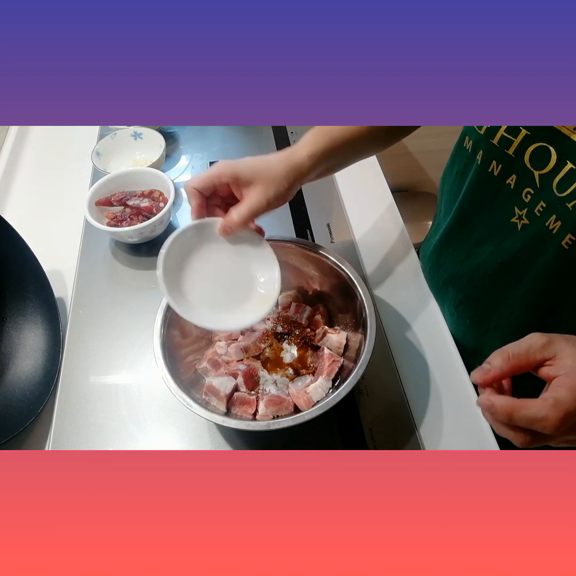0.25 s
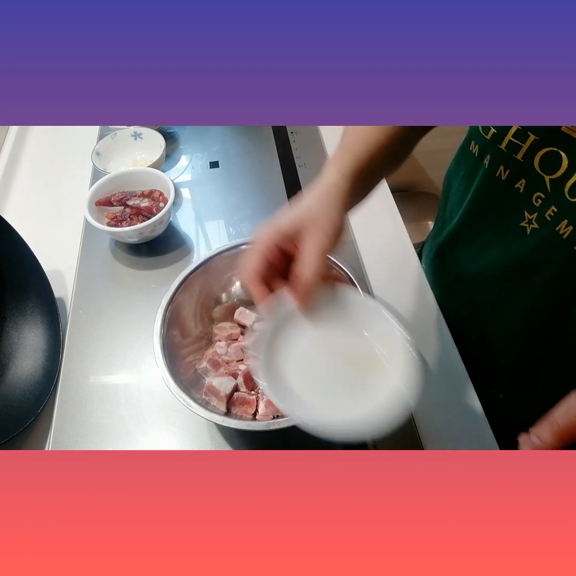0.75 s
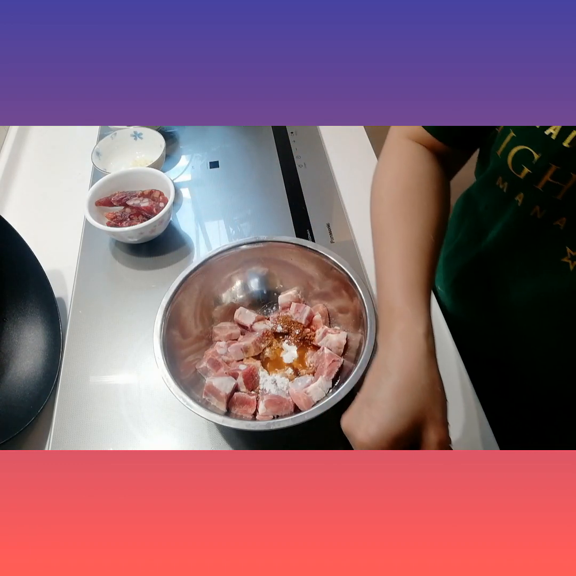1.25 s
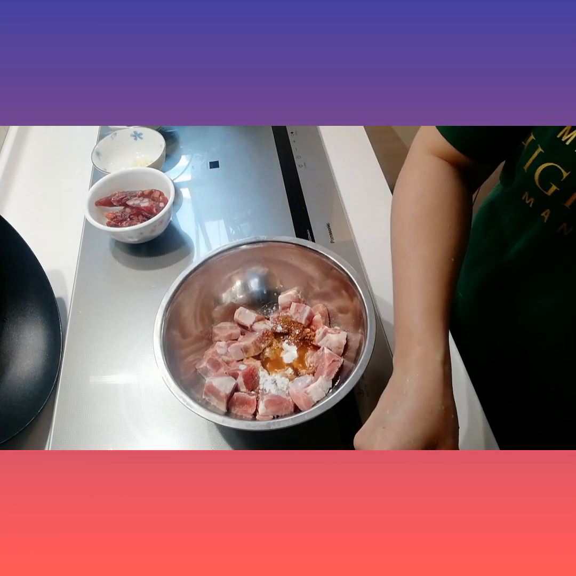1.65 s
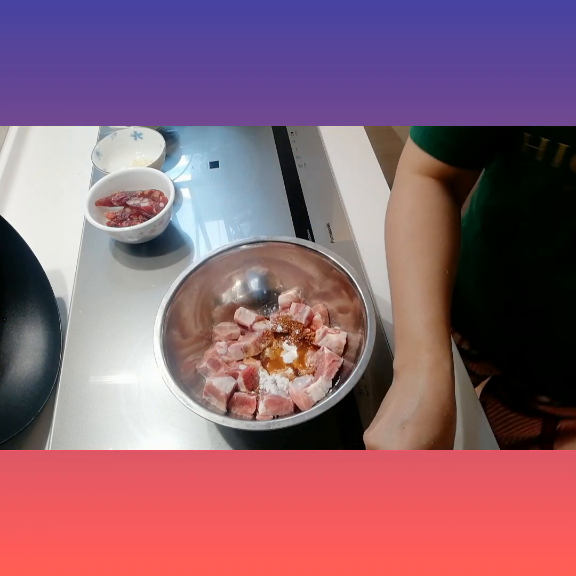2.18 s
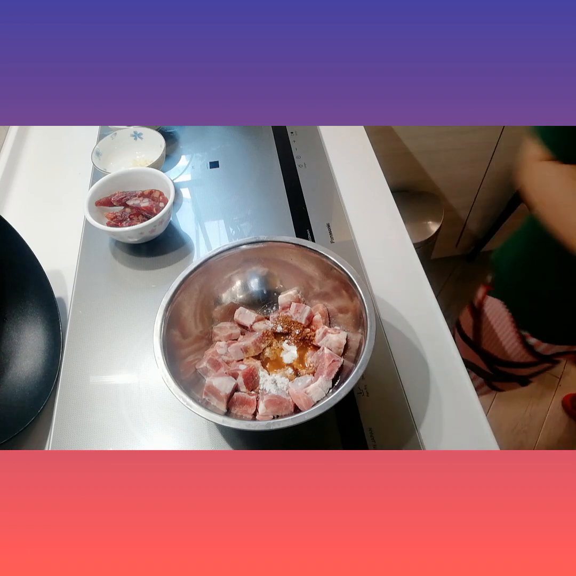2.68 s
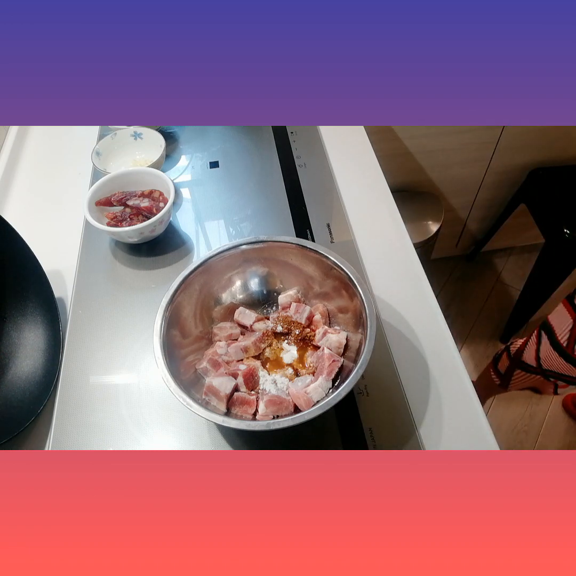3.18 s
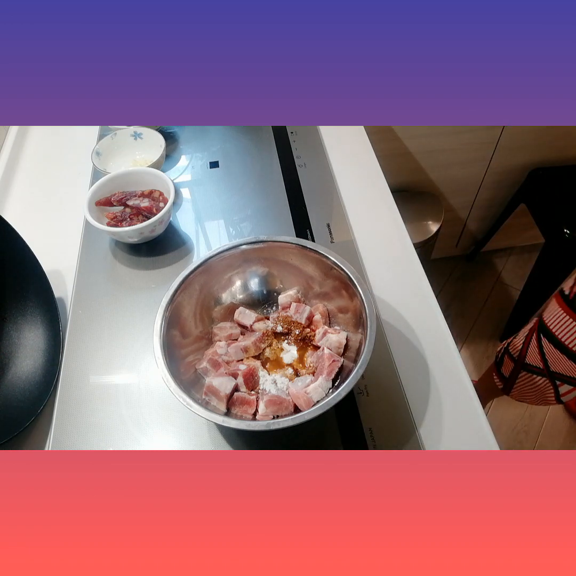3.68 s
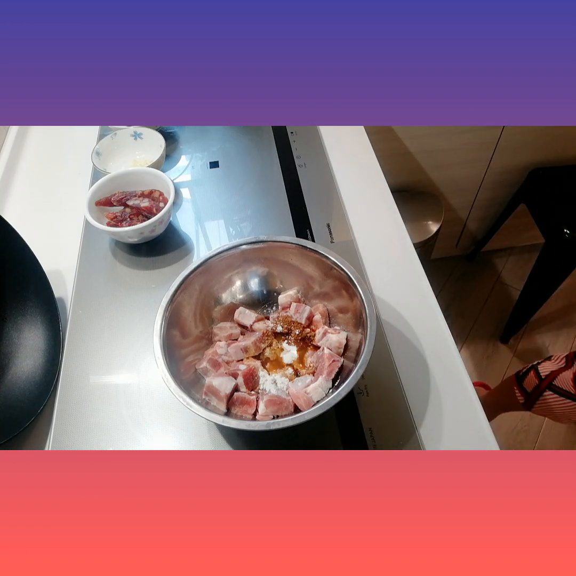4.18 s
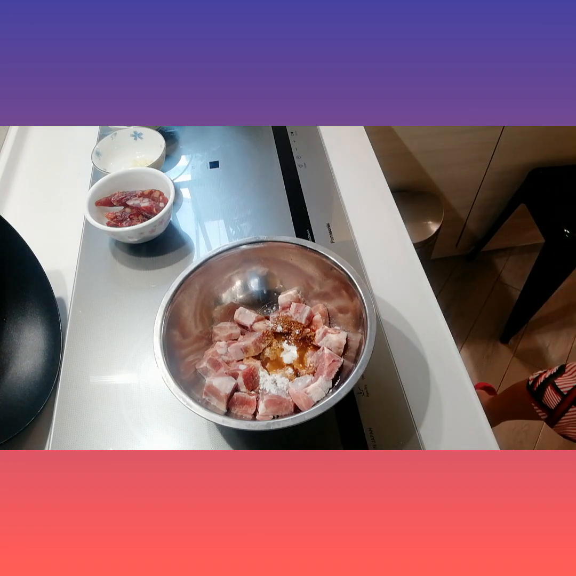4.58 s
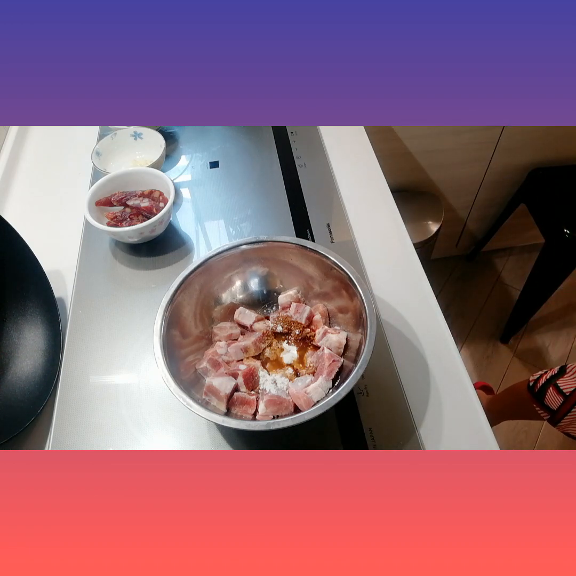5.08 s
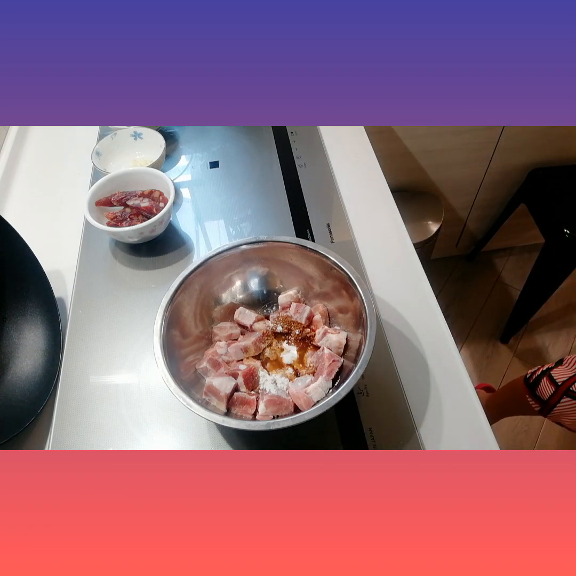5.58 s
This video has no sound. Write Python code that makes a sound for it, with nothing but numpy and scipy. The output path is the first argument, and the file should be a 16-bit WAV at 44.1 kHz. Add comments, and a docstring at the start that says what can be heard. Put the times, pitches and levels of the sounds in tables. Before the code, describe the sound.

A ventilation fan drones softly throughout, an airy rush with a low hum, in a hard-walled kitchen with a short echo. At about 1.5 seconds a small china dish lands on a worktop, close and slightly left, with a bright clack and a few rim ticks as it rocks. From 1.9 to 2.2 seconds it is shifted, giving damped clacks and hollow thuds. Soft sleeve and hand swishes follow until about 3 seconds. Feet shuffle, and at 3.3 seconds a cupboard door thuds dully further off. Around 3.5 seconds a bottle slides out and knocks the shelf, and at 3.7 its cap snaps open. Faint shuffling continues. A light knock at 5 seconds leads straight into the loudest sound, a bright glass clink against other ware, slightly left, ringing for about half a second. A soft footfall and rustle come near 5.5 seconds, over the fan.

```python
"""A hard-walled kitchen, with a ventilation fan droning underneath. Close by, a cook puts a small china dish
down on a worktop, shifts it, picks up a bottle with a few hand-damped clacks, and steps away. Further off a
cupboard thuds, a bottle is dragged out, its cap snaps open, and the glass clinks loudly against other ware.
Each knock is a burst of fading noise; china and glass add ringing tones, and the walls echo. Sleeves, hands and
shuffling feet make soft swells of noise."""
import sys
import numpy as np
from scipy import signal
from scipy.fft import rfft, irfft, next_fast_len
from scipy.io import wavfile
from scipy.ndimage import uniform_filter1d

SR = 44100
rng = np.random.default_rng(int(sys.argv[2]) if len(sys.argv) > 2 else 0)


def inscribe(sig):
    """Save sig as 16-bit PCM at rate SR to the path in sys.argv[1].

    A 1-D sig is mono; a 2-D sig holds one channel per row.
    Samples are clipped to [-1, 1] before scaling.
    """
    pcm = np.round(np.clip(np.atleast_2d(sig).T, -1, 1) * 32767)
    wavfile.write(sys.argv[1], SR, pcm.astype(np.int16))


N = 257544
TIME = np.arange(N) / SR
AGE = np.arange(int(.8 * SR)) / SR   # seconds since a knock


def from_db(db):
    """Turn decibels into a gain."""
    return 10 ** (np.asarray(db) / 20)


def rms_one(x):
    """Scale a sound to an average (rms) level of one."""
    return x / np.sqrt(np.mean(x ** 2) + 1e-20)


def at_hz(points, hz):
    """Read between a table's rows on a log-frequency scale."""
    freq, value = np.transpose(points)
    return np.interp(np.log(np.maximum(hz, 1)), np.log(freq), value)


def coloured(x, spectrum):
    """Give a sound a tone colour without smearing it back in time (minimum phase)."""
    size = 2 * next_fast_len(x.shape[-1])
    gain = from_db(at_hz(spectrum, np.fft.rfftfreq(size, 1 / SR)))
    cepstrum = irfft(np.log(gain))
    cepstrum[1:size // 2] *= 2
    cepstrum[size // 2 + 1:] = 0
    return irfft(rfft(x, size) * np.exp(rfft(cepstrum)))[..., :x.shape[-1]]


def fade(seconds):
    """A fade time is how long a sound takes to fall by 60 dB."""
    return 1000 ** (-AGE / seconds)


def swell(at_s, level_db, rise_s, fall_s):
    """One movement: it gains 20 dB over its rise and loses 20 dB over its fall."""
    away = np.maximum((at_s - TIME) / rise_s, (TIME - at_s) / fall_s)
    return from_db(level_db - 20 * np.minimum(away, 10))


# Stereo spread. Each row: frequency in Hz, side level against the middle in dB.
STEREO_WIDTH = [(50, -26), (130, -31), (250, -6.5), (500, 5), (1000, 3), (12000, -2)]
def stereo_noise(size, width=STEREO_WIDTH):
    """Even noise, centred in the bass and wide higher up."""
    mid, side = rfft(rng.standard_normal((2, size)))
    share = from_db(at_hz(width, np.fft.rfftfreq(size, 1 / SR)))
    return irfft((mid + share * side * [[1], [-1]]) / np.sqrt(1 + share ** 2), size)


# How long the room rings. Each row: frequency in Hz, fade time in seconds.
ROOM_FADE = [(80, 0.53), (300, 0.47), (1000, 0.63), (3500, 0.55), (8000, 0.55), (14000, 0.4)]
def kitchen_echo(build_s):
    """Countless wall reflections blur together; each band fades at its own rate."""
    noise, echo = rfft(stereo_noise(len(AGE))), 0
    hz = np.fft.rfftfreq(len(AGE), 1 / SR)
    centres = np.geomspace(80, 14000, 10)
    for centre, pick in zip(centres, np.eye(len(centres))):
        band = irfft(noise * at_hz(np.c_[centres, pick], hz), len(AGE))
        echo = echo + band * fade(at_hz(ROOM_FADE, centre))
    echo = echo * (1 - np.exp(-AGE / build_s))
    return rms_one(echo) / np.sqrt(len(AGE))


def reflected(x, echo):
    """What the walls send back."""
    return signal.fftconvolve(x, echo, axes=-1)[:, :x.shape[-1]]


def wander(rate_hz, count=200):
    """A random drift in strength and phase for each channel."""
    knots = rng.standard_normal((2, count, 2)) @ [1, 1j] / np.sqrt(2)
    return np.array([np.interp(AGE * rate_hz, np.arange(count), row) for row in knots])


def ringing(tones, shimmer, flutter_hz=59.0):
    """A struck object's tones flutter as wall reflections pile up and beat with them."""
    pitches, levels_db, fades_s = np.transpose(tones)
    gains, ring = from_db(levels_db), 0
    reflections = shimmer * np.sqrt(AGE * flutter_hz)   # echoes add as the root of their number
    for hz, gain, fade_s in zip(pitches, gains, fades_s):
        tone = np.exp(2j * np.pi * (hz * AGE + rng.random((2, 1)))) * fade(fade_s)
        ring = ring + gain * np.real(tone * (1 + reflections * wander(flutter_hz)))
    return ring / np.sqrt(np.sum(gains ** 2))


def knocks(hits, colour, echo, gain_db, rise_s, tones=None, ring_echo_db=0, shimmer=0.93):
    """Each contact makes a noise burst, an echo and any ringing tones; gain_db shifts every level."""
    out = np.zeros((2, N + len(AGE)))
    attack = 1 - np.exp(-AGE / rise_s)
    for start_s, level_db, fade_s, echo_db, *ring_db in hits:
        shape = attack * fade(fade_s)
        noise = coloured(stereo_noise(len(AGE)), colour)
        burst = rms_one(shape * noise) * np.sqrt(np.mean(shape ** 2))
        ring = from_db(ring_db[0]) * attack * ringing(tones, shimmer) if ring_db else 0
        walls = from_db(echo_db) * reflected(burst + from_db(ring_echo_db) * ring, echo)
        start = round(start_s * SR)
        out[:, start:start + len(AGE)] += from_db(level_db + gain_db) * (burst + ring + walls)
    return out[:, :N]


# The fan's air and its duct tones. Each row: frequency in Hz, relative level in dB.
AIR_COLOUR = [(13, -41), (22, -6), (64, -8), (100, -12), (211, -5.5), (256, -16.5), (302, -6.5), (356, -24),
              (554, -12), (771, -11), (1300, -23), (1710, -19), (2260, -26.5), (3150, -27.5),
              (16000, -42.5)]
DUCT_TONES = [(102.3, -63), (145.3, -66), (306.8, -67), (786.0, -68), (1233, -76.5)]
# Its spread. Each row: frequency in Hz, side level against the middle in dB.
FAN_WIDTH = [(60, -30), (92, -25), (140, -14), (210, -14.5), (330, -2), (500, 2), (770, 5.5), (1170, -8),
             (1790, 1), (2740, -1), (4190, 1), (6410, 1.5), (9810, -1.5), (15000, 2)]
def fan(air_db, hum_gain_db, hum_width_hz):
    """Air rushes, and narrow duct resonances hum in it."""
    out = from_db(air_db) * rms_one(coloured(stereo_noise(N, FAN_WIDTH), AIR_COLOUR))
    radius = np.exp(-np.pi * hum_width_hz / SR)
    for hz, level_db in DUCT_TONES:
        feedback = [1, -2 * radius * np.cos(2 * np.pi * hz / SR), radius ** 2]
        hum = signal.lfilter([1, 0, -1], feedback, stereo_noise(N, FAN_WIDTH))
        out = out + from_db(level_db + hum_gain_db) * rms_one(hum)
    return out


# Sleeve and hand sliding. Each row: peak time in seconds, level in dB, rise and fall in seconds.
STROKES = [(2.208, -45.5, 0.042, 0.077), (2.52, -66, 0.024, 0.064), (2.695, -55.5, 0.16, 0.13),
           (2.885, -63, 0.073, .22), (3.39, -53, 0.082, 0.18), (3.506, -46, 0.03, 0.057),
           (4.216, -68, 0.19, .3), (4.404, -65.5, .06, 0.11), (5.465, -58, 0.071, 0.23),
           (5.645, -66, 0.043, 0.081)]
# Their hiss. Each row: frequency in Hz, relative level in dB.
RUB_COLOUR = [(500, -5), (1300, 4), (2300, 0.5), (3200, 2), (5500, -2.5), (8000, -2.5), (11200, -2),
              (13000, -12), (16000, -20)]
def rubbing(echo, grain_db, echo_db):
    """Friction: countless tiny slips of uneven size under each stroke."""
    strokes = sum(swell(*row) for row in STROKES)
    noise = stereo_noise(N)
    grain = rms_one(uniform_filter1d(rng.standard_normal(N), size=60))
    rub = strokes * rms_one(coloured(noise * from_db(grain_db * grain), RUB_COLOUR))
    return rub + from_db(echo_db) * reflected(rub, echo)


# Feet shifting their weight. Each row: peak time in seconds, level in dB.
SHUFFLES = [(0.23, -55.5), (0.98, -55.5), (2.89, -54), (3.31, -43), (3.56, -45.5), (3.75, -50),
            (3.95, -45.5), (4.2, -53.5), (4.42, -53.5), (5.15, -42), (5.581, -44.5)]
# The cupboard door; footfalls and soft bumps.
# Each row: start in seconds, relative level in dB, fade time in seconds, echo in dB.
DOOR_HITS = [(3.261, -28, 0.13, -4), (3.282, -32.5, 0.11, -4)]
BUMP_HITS = [(3.261, -28.5, 0.17, -3), (3.294, -35, 0.12, -15), (3.326, -25, 0.11, -8.5),
             (3.385, -31, 0.076, -31), (5.465, -39.5, 0.2, -14)]
# Their tone colours. Each row: frequency in Hz, relative level in dB.
DOOR_COLOUR = [(120, -65), (200, -18), (266, -49), (323, 14.5), (373, -22), (694, -17.5), (844, -27),
               (906, -19.5), (1340, -20), (2100, -25), (2800, -39.5), (8820, -47), (14000, -60)]
BUMP_COLOUR = [(25, -43), (45, -13), (68, -3), (98, 1.5), (140, 0.5), (175, -14.5), (210, -22.5),
               (400, -19), (1000, -54), (5000, -91)]
def cupboard_and_steps(echo):
    """Wood knocks dully, steps thump, and the floor rumbles softly under shifting feet."""
    door = knocks(DOOR_HITS, DOOR_COLOUR, echo, gain_db=-5, rise_s=0.0026)
    weight = sum(swell(*row, rise_s=0.094, fall_s=0.14) for row in SHUFFLES)
    rumble = weight * rms_one(coloured(stereo_noise(N), BUMP_COLOUR))
    bumps = knocks(BUMP_HITS, BUMP_COLOUR, echo, gain_db=0, rise_s=0.0094)
    return door + rumble + bumps


# The dish landing, its rim ticking as it rocks, hand-damped clacks of a bottle being picked up, and the worktop
# below. Each row: start in seconds, relative level in dB, fade time in seconds, echo in dB, ring in dB (china
# and bottle only).
LANDING_HITS = [(1.5222, -16, 0.09, -9.5, 6), (1.5255, -15, 0.095, -8.5, 1.5)]
RIM_HITS = [(1.624, -17, 0.091, -7.5, -5.5), (1.675, -22, 0.064, -24, -6), (1.787, -41.5, 0.083, -37, -4)]
CLACK_HITS = [(1.8865, -25.5, 0.12, -8, 4), (1.894, -20, 0.023, -14, 6), (2.0095, -18, 0.07, -9, -20),
              (2.027, -23, 0.12, -22, 2.5), (2.136, -27, 0.059, -2, -29)]
WORKTOP_HITS = [(1.528, -40, 0.19, 11), (1.895, -37.5, 0.16, -10), (2.019, -29, 0.24, -3),
                (2.147, -26.5, 0.07, -16)]
# Their tone colours. Each row: frequency in Hz, relative level in dB.
LANDING_COLOUR = [(88, -49), (150, -38), (212, -9), (386, -30), (833, -10.5), (1350, -21.5), (1770, -6),
                  (2140, -23), (3890, -14), (5720, -25), (6940, -15), (8250, -24.5), (11500, -18),
                  (13400, -30), (15000, -89)]
RIM_COLOUR = [(150, -30), (800, 4.5), (1400, -6.5), (2400, -9.5), (3100, 3), (3700, 0), (4400, -4),
              (5100, 8), (5800, -8), (7100, 2), (8500, -8), (9400, -3), (12800, -9), (15000, -31)]
CLACK_COLOUR = [(71, -32), (120, -30), (226, -11.5), (334, -19), (454, -21.5), (712, -12.5), (789, -8.5),
                (1430, -12), (1620, -17.5), (2000, -16.5), (2990, -13), (3820, -13), (4590, -14),
                (9990, -11), (16000, -28)]
WORKTOP_COLOUR = [(100, -60), (170, -9), (220, 8), (300, 5.5), (420, -7), (800, -80)]
# The china's ring and the picked-up bottle's. Each row: pitch in Hz, relative level in dB, fade time in
# seconds.
DISH_TONES = [(840, -8.5, 0.16), (1720, 4.5, 0.15), (1743, 1, 0.2), (3490, 8, 0.066), (3870, 12.5, 0.061),
              (6840, 3, 0.094), (7360, -15, 0.083), (9310, 9.5, 0.067), (11000, -7, 0.12), (11900, 0, 0.1)]
CLACK_TONES = [(866, -12, 0.095), (1413, -15, 0.11), (1908, -2, 0.059), (2190, -9, 0.13),
               (3880, -5.5, 0.086), (6950, 5, 0.06), (8400, -2, 0.041), (9350, 6, 0.023),
               (10350, 10, 0.022)]
def dish_and_bottle(echo):
    """Nearby china and a picked-up bottle ring briefly at each contact, and the worktop answers with a hollow
    thud."""
    landing = knocks(LANDING_HITS, LANDING_COLOUR, echo, gain_db=-9, rise_s=0.00054,
                     tones=DISH_TONES, ring_echo_db=-9.5)
    rocking = knocks(RIM_HITS, RIM_COLOUR, echo, gain_db=-12.5, rise_s=0.00028, tones=DISH_TONES)
    clacks = knocks(CLACK_HITS, CLACK_COLOUR, echo, gain_db=-6.5, rise_s=0.0012,
                    tones=CLACK_TONES, ring_echo_db=-1.5)
    worktop = knocks(WORKTOP_HITS, WORKTOP_COLOUR, echo, gain_db=-14.5, rise_s=0.0031)
    return (landing + rocking + clacks) * from_db([[.6], [-.6]]) + worktop   # china and bottle a little left


# A knock on the shelf, the cap snapping, a hand-damped nudge, and the clink. Each row: start in
# seconds, relative level in dB, fade time in seconds, echo in dB, ring in dB (none for the nudge).
SHELF_HITS = [(3.519, -28, 0.17, -5.5, 1.5), (3.531, -26, 0.069, -1, -24)]
CAP_HITS = [(3.727, -22.5, 0.095, 1, -38), (3.732, -24, 0.26, -21, -2)]
NUDGE_HITS = [(5.012, -29, 0.12, -1), (5.017, -24, 0.14, -2.5)]
CLINK_HITS = [(5.1095, -10, 0.026, 7, -22), (5.1125, -6.5, 0.048, -0.5, -41), (5.1215, -9.5, 0.097, 1, 0.5),
              (5.144, -25, 0.026, 5, -10)]
# Their tone colours. Each row: frequency in Hz, relative level in dB.
SHELF_COLOUR = [(180, -38), (300, -7.5), (444, -21), (568, -9), (669, -23), (975, -10), (1730, -11),
                (2210, -8.5), (5010, -23.5), (10500, -24), (15000, -38)]
CAP_COLOUR = [(500, -37), (800, -3.5), (1100, -1.5), (1700, -10), (2600, -6.5), (3600, 0), (4600, -10),
              (6000, -14.5), (8000, -8), (9700, -12), (11200, -5), (12700, -11), (14000, -37)]
NUDGE_COLOUR = [(240, -59), (400, -21), (690, -20), (880, 5), (979, -13), (1250, 0), (2030, -11.5),
                (2870, -9), (4670, -24), (5110, -20), (6130, -26), (9520, -20.5), (10300, -24.5),
                (15000, -48)]
CLINK_COLOUR = [(76, -49.5), (130, -51), (318, 2), (380, -27), (492, -7.5), (650, -14.5), (850, 0),
                (1050, -8), (1650, -1.5), (2320, -9), (2880, -3.5), (3960, -11), (5130, -8.5), (5780, -15),
                (9310, -9.5), (12800, -24), (15000, -45)]
# The ring after each knock; in the clink, high glass tones over fainter low tones.
# Each row: pitch in Hz, relative level in dB, fade time in seconds.
SHELF_TONES = [(962, -6, 0.27), (1116, -19, 0.12), (1860, -17, 0.18), (2202, 8, 0.086), (2272, 4, 0.12),
               (2430, -9, 0.089)]
NECK_TONES = [(1033, -0.67, 0.33), (1180, -1.6, 0.32), (3440, 0, 0.12), (3690, -1.8, 0.077)]
CLINK_TONES = [(990, -12, .34), (1200, -11, .37), (1410, -7, .36), (1665, -6, .32), (1780, -7, .35),
               (2180, -7, .33), (2886, -8, .38), (2906, -3, .52), (3695, -11, .4), (4470, -9, .38),
               (4498, -5.5, .46), (4565, -6, .38), (4972, -7, .38), (5015, -2.5, .49), (5032, -5, .49),
               (6800, -13, .35), (7280, -14, .3), (7770, -14, .33), (8956, -3, .36), (9157, -6, .36),
               (9648, -3, .28), (10430, -8, .28), (10530, -5, .23), (11070, -6, .35)]
def bottle(echo):
    """Across the room glass knocks the shelf, its neck answers the cap, and it strikes other ware."""
    shelf = knocks(SHELF_HITS, SHELF_COLOUR, echo, gain_db=-9, rise_s=0.0023,
                   tones=SHELF_TONES, ring_echo_db=-4)
    cap = knocks(CAP_HITS, CAP_COLOUR, echo, gain_db=-11.5, rise_s=0.0015,
                 tones=NECK_TONES, ring_echo_db=-10)
    nudge = knocks(NUDGE_HITS, NUDGE_COLOUR, echo, gain_db=-7, rise_s=0.002)
    clink = knocks(CLINK_HITS, CLINK_COLOUR, echo, gain_db=-9.5, rise_s=0.0004,
                   tones=CLINK_TONES, ring_echo_db=-15.5, shimmer=0.85)
    return shelf + cap + nudge + clink * from_db([[.5], [-.5]])   # clink a little left


def scene():
    """The cook's sounds share one kitchen, over the steady fan."""
    echo = kitchen_echo(build_s=0.00032)
    cook = dish_and_bottle(echo) + cupboard_and_steps(echo) + bottle(echo)
    cook += rubbing(echo, grain_db=2.5, echo_db=-6)
    return cook + fan(air_db=-56, hum_gain_db=1.96, hum_width_hz=8.4)


# The microphone's two sides. Each row: frequency in Hz, gain in dB.
LEFT_MIC = [(6000, 2.5), (9000, 3), (11000, 6), (15000, 1.5)]
RIGHT_MIC = [(6000, 2.5), (9000, 4), (11000, -3), (15000, 0)]
def record(dry):
    """The right side is duller than the left, and both are cut above 16 kHz."""
    sides = np.array([coloured(dry[0], LEFT_MIC), coloured(dry[1], RIGHT_MIC)])
    treble_cut = signal.ellip(10, .1, 80, 16000, fs=SR, output="sos")
    return signal.sosfilt(treble_cut, sides)


dry = scene()
out = record(dry)
inscribe(out)
```